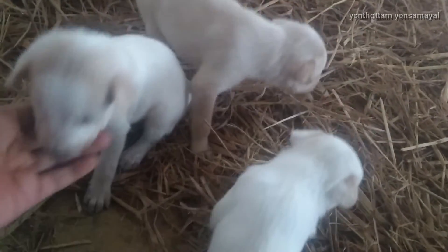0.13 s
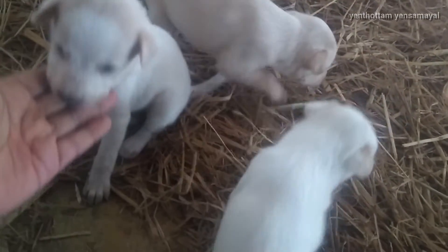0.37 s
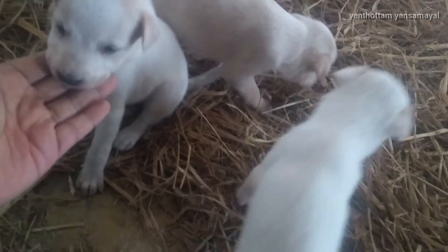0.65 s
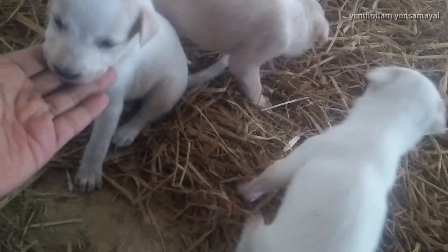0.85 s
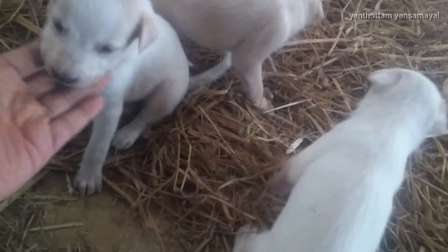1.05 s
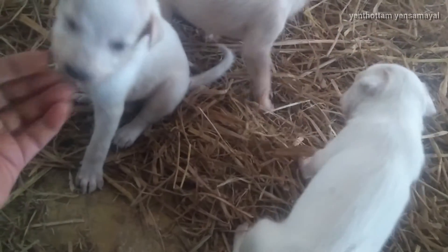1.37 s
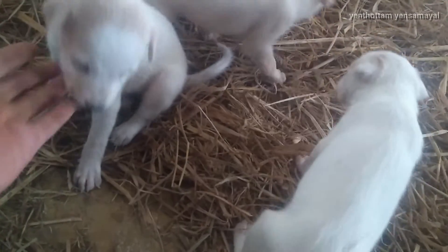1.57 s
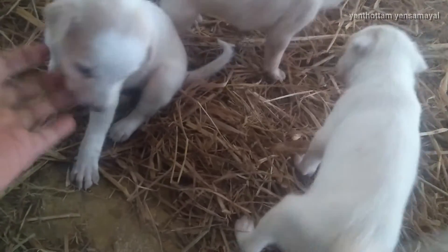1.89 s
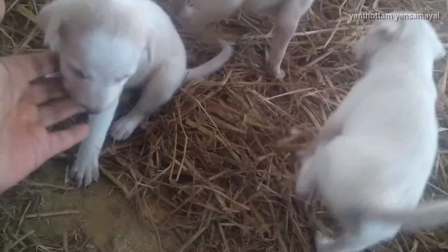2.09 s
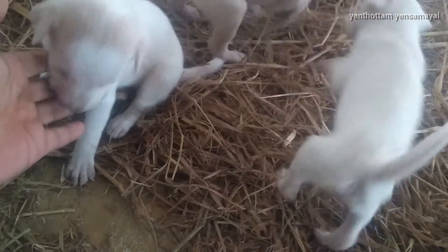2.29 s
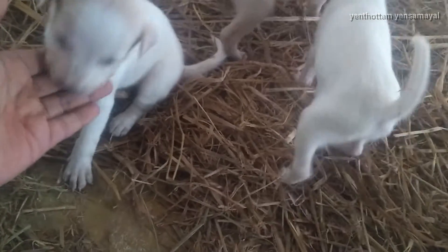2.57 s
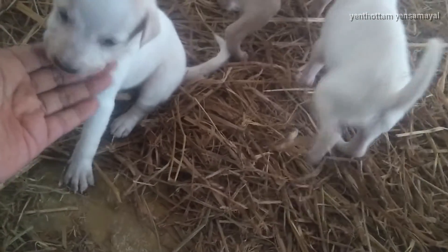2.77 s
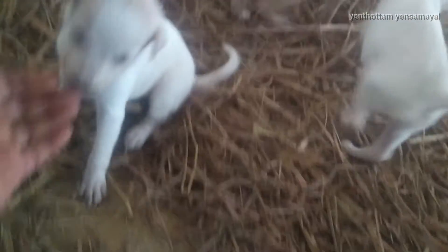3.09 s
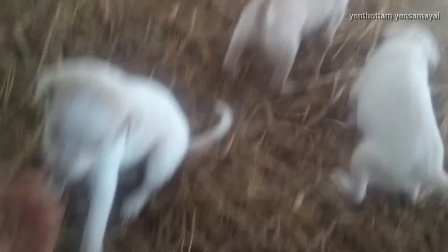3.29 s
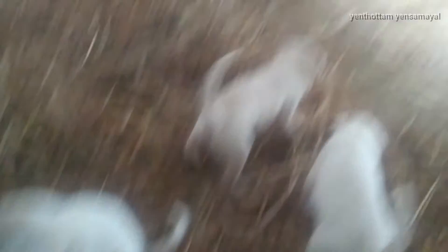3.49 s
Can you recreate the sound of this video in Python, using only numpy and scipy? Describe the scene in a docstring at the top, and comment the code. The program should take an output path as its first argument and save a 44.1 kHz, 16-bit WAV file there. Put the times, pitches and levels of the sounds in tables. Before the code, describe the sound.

Puppies whimpering close up in short high squeaky yelps, with faint straw rustle underneath

```python
"""Puppies whimpering close up

Puppies whimper in short, nearly pure glides, close to the microphone: sines with faint overtones.
Some calls come from farther off, rough and wet, with unsteady pitch and more echo.
A hiss with small crackles, perhaps straw, swells with the calls and in a few bursts between.
A shed rings briefly as a decaying noise tail, over a faint wavering background of noise.
A suppressor turns quiet moments down; a stereo widener sets left and right apart."""
import sys
import numpy as np
from scipy import signal
from scipy.fft import rfft, irfft, next_fast_len
from scipy.io import wavfile
from scipy.ndimage import uniform_filter1d

SR = 44100
rng = np.random.default_rng(int(sys.argv[2]) if len(sys.argv) > 2 else 0)


def volts(x):
    """Linear amplitude factor 10**(x/20) for a level x in dB, scalar or array-like."""
    e = np.asarray(x, float) / 20
    return 10 ** e


def log_audio(samples):
    """Write samples as a 16-bit WAV file to the path given in sys.argv[1]."""
    # one column per channel
    frames = np.atleast_2d(samples).T
    # limit to full scale, then quantise
    limited = np.clip(frames, -1, 1)
    pcm = np.round(limited * 32767).astype(np.int16)
    wavfile.write(sys.argv[1], SR, pcm)


N = 160965  # length in samples
HZ = np.fft.rfftfreq(next_fast_len(N), 1 / SR)  # frequency of each spectrum bin


def read(table, hz):
    """Interpolate a (frequency_hz, value) table on a log-frequency axis."""
    points = np.array(table)
    return np.interp(np.log(np.maximum(hz, 1)), np.log(points[:, 0]), points[:, 1])


def shape(x, gain):
    """Filter by multiplying the spectrum by a gain."""
    size = next_fast_len(N)
    return irfft(rfft(x, size) * gain, size)[..., :N]


def unit(x):
    """Scale to rms 1."""
    return x / np.sqrt(np.mean(x ** 2))


def walk(hz):
    """Smooth random drift of rms 1: noise through a Gaussian low-pass about hz wide."""
    return unit(shape(rng.standard_normal(N), np.exp(-(HZ / hz) ** 2)))


def diffuse(x, other):
    """Mix two noises as sum and difference, so that left and right are partly alike."""
    # likeness of a diffuse sound at left and right: frequency_hz, correlation (0 to 1)
    likeness = [(60, 0.83), (1500, 0.88), (2500, 1), (4300, 0.25), (7000, 0.41), (12000, 0.17)]
    alike = np.clip(read(likeness, HZ), 0, 1)
    common = shape(x, np.sqrt((1 + alike) / 2))
    opposed = shape(other, np.sqrt((1 - alike) / 2))
    return common + np.array([[1], [-1]]) * opposed


def puppies():
    """Gliding tones with overtones and a slightly unsteady larynx; returns direct sound and echo feed."""
    # each call, or a high overtone or echo of one given its own line:
    # voice, (octave_db, high_db at harmonic 3.5, echo_db, place), rows of (time_s, pitch_hz, level_db)
    # place: 1 left to -1 right, limited to that range
    whimpers = [ ("husky", (-8.5, -31, -0.5, -0.2), [(0.005, 788, -60), (0.052, 837, -49.5),
                (0.072, 923, -51), (0.09, 900, -42), (0.118, 906, -62), (0.14, 890, -41.5),
                (0.16, 889, -53.5), (0.182, 899.6, -44), (0.2, 887, -54.5)]),
                ("clear", (-1.5, -23.5, -16.5, 0.54), [(0.162, 1001, -52), (0.18, 1203, -44),
                (0.222, 1300, -43.5), (0.276, 1266, -41), (0.286, 973, -25.5), (0.298, 1108, -63)]),
                ("clear", (-39.5, -33, -5, -1), [(0.225, 796, -48.5), (0.245, 573, -49),
                (0.262, 566, -73)]), ("husky", (2, -33.5, 2, -0.26), [(0.35, 890, -49.5),
                (0.4, 1120, -54.5), (0.456, 1043, -49.5), (0.505, 1066, -50.5)]),
                ("clear", (-18, -44, 2, 8), [(0.452, 710, -80), (0.466, 659, -39.5), (0.485, 606, -105)]),
                ("clear", (-8.5, -35.5, -23.5, 0), [(0.503, 1106, -49.5), (0.512, 1011, -30),
                (0.532, 1007, -26), (0.539, 875, -20.5), (0.557, 871, -22.5), (0.566, 835, -41.5)]),
                ("clear", (-45, -34.5, -24, 3), [(0.556, 766, -37), (0.566, 674, -37.5),
                (0.58, 733, -76.5)]), ("husky", (-14.5, -35, -18, 3.7), [(0.653, 692, -48.5),
                (0.658, 669, -40), (0.664, 617, -51.5), (0.678, 636.4, -33), (0.692, 661, -26),
                (0.716, 800, -37), (0.762, 792.6, -29.5), (0.778, 827, -46.5)]),
                ("husky", (-29.5, -45, 2, 0), [(0.77, 3256, -71), (0.798, 3100, -61.5),
                (0.87, 3436, -82.5)]), ("husky", (-13, -34.5, -11, 0.5), [(0.942, 1050, -63.5),
                (0.974, 1080, -46.5), (1.0, 1024, -57.5)]), ("rough", (-34, -40, -17, 7),
                [(0.944, 642, -54.5), (0.961, 668, -53), (0.972, 611, -37), (0.986, 786, -49.5),
                (1.015, 638, -53.5)]), ("raspy", (-35, -35, -20.5, 10), [(1.187, 742, -57.5),
                (1.194, 751, -34), (1.208, 753, -31), (1.221, 785, -31.5), (1.227, 665.4, -41),
                (1.236, 641, -28), (1.245, 628.3, -30), (1.258, 633, -44), (1.295, 693, -54)]),
                ("husky", (-40, -53.5, 2.5, -0.6), [(1.185, 3815, -59), (1.221, 3934, -56.5),
                (1.28, 3740, -67)]), ("clear", (-32, -44, -9.5, 1.5), [(1.22, 2620, -68),
                (1.276, 2610, -57), (1.295, 2481, -76.5)]), ("clear", (-20.5, -37, -24.5, 0.5),
                [(1.421, 773, -55.5), (1.432, 740, -32.5), (1.447, 743, -30.5), (1.458, 750, -56)]),
                ("clear", (-18, -22, -16, -5.5), [(1.672, 1145, -68), (1.722, 1188, -60),
                (1.75, 1144, -63)]), ("clear", (-18.5, -45.5, -7, 0.3), [(1.735, 993, -56.5),
                (1.749, 955, -53), (1.762, 779, -58.5)]), ("husky", (-37.5, -34.5, -8, 5.5),
                [(1.778, 1550, -82), (1.794, 1592, -52.5), (1.83, 1530, -84)]),
                ("clear", (-11, -27.5, -14.5, 0), [(1.93, 1203, -78), (1.992, 1187, -46),
                (2.014, 1227, -41.5), (2.035, 854, -52)]), ("husky", (-8, -26, -3.5, 0), [(2.18, 1296, -66),
                (2.22, 1380, -49.5), (2.25, 1361, -64.5), (2.267, 1317, -35.5), (2.28, 1210, -61)]),
                ("rough", (-28.5, -50.5, -1.5, -3.3), [(2.168, 2800, -47), (2.2, 2773, -71.5),
                (2.27, 2750, -81)]), ("clear", (-22.5, -38, -13.5, .01), [(2.243, 950, -75),
                (2.253, 964, -38.5), (2.264, 1046, -33.5), (2.279, 880, -32.5), (2.288, 715, -38.5)]),
                ("clear", (-50, -55, 1.5, -4.5), [(2.298, 3440, -54), (2.323, 3434, -46.5),
                (2.342, 3431, -69.5), (2.357, 3450, -50.5), (2.405, 3388, -43), (2.427, 3370, -50.5),
                (2.44, 3220, -40.5)]), ("clear", (-2, -24, -14, .4), [(2.486, 1312, -61.5),
                (2.498, 1314, -40), (2.516, 1321, -36.5), (2.526, 1424, -24.5), (2.542, 1454, -21),
                (2.568, 1441, -21.5), (2.59, 1358, -34), (2.6, 1260, -63)]), ("raspy", (19, -10, -10, 0.2),
                [(2.595, 1188, -43.5), (2.602, 1169, -45.5), (2.617, 1028, -52)]),
                ("clear", (1, -19, -10, 0.45), [(2.779, 1324, -42.5), (2.79, 1258, -35),
                (2.812, 1297, -28.5), (2.828, 1377, -25.5), (2.846, 1396, -33.5), (2.866, 1292, -38),
                (2.883, 1312, -37), (2.889, 973, -37), (2.899, 915, -46.5)]),
                ("clear", (-11.5, -25, -8, 0.32), [(3.063, 1183, -56.5), (3.082, 1106, -35.5),
                (3.098, 1098, -43.5), (3.118, 1123, -30), (3.138, 1123, -31.5), (3.146, 1076, -38)]),
                ("clear", (-20, -47, -22.5, -0.33), [(3.144, 1000, -45.5), (3.156, 1023, -27),
                (3.174, 926, -23), (3.192, 920.5, -22), (3.214, 983, -25), (3.266, 1012, -26),
                (3.28, 941, -27.5), (3.288, 1034, -53)]), ("clear", (-38, -45, -16, -8), [(3.268, 834, -80),
                (3.276, 796, -42.5), (3.305, 605, -53)]), ("husky", (8, -33, -7, 0.7),
                [(3.297, 1486, -69.5), (3.35, 1526, -70.5), (3.39, 1416, -67), (3.44, 1456, -54)]),
                ("clear", (-3.5, -21.5, -8.5, 0), [(3.445, 1178, -67), (3.463, 1140, -39.5),
                (3.519, 1248, -35.5), (3.563, 1118, -39), (3.629, 1183, -44), (3.65, 1166, -36.5)]),
                ("raspy", (-14, -36, -8.5, 0.6), [(3.465, 818, -56), (3.513, 941, -35.5),
                (3.525, 831, -41.5), (3.57, 880, -78)]), ]
    # each voice: pitch_shake (share of pitch), level_flutter_db, overtone_waver_db (before scaling), breath_db
    voices = {"clear": (.003, .6, 2.5, -43), "husky": (.012, 1.6, 4, -28), "raspy": (.014, 1.3, 5, -25),
              "rough": (.035, 3.5, 4, -20)}
    # colour of the breath noise: frequency_hz, gain_db
    breath_colour = [(300, -30), (470, 0), (2000, -5), (2500, -30)]
    wobble_hz = 124.4  # speed of the roughness
    attack_s, edge_s = 0.002, 0.0053  # fade before the first row and after the last
    side_ms = 0.07  # lead of the nearer side for a line fully to that side
    closing_db = 28  # overtones lost for each octave under the top pitch of a line, as the mouth closes

    direct, feed = np.zeros((2, N)), np.zeros(N)
    shake, flutter, waver = walk(wobble_hz), walk(wobble_hz), walk(70.)
    breath = unit(shape(rng.standard_normal(N), volts(read(breath_colour, HZ))))
    for voice, (octave_db, high_db, echo_db, place), rows in whimpers + moans():
        row_s, row_hz, row_db = np.array(rows).T
        shake_share, flutter_db, waver_db, breath_db = voices[voice]
        first = max(int((row_s[0] - edge_s) * SR), 0)
        last = min(int((row_s[-1] + edge_s) * SR), N)
        i = np.arange(first, last)
        t = i / SR

        glide = np.interp(t, row_s, row_hz)
        pitch = uniform_filter1d(glide, size=99) * (1 + shake_share * shake[i])
        # left and right each take half of the lead
        side_s = side_ms * np.clip(place, -1, 1) / 2000 * np.array([[1], [-1]])
        phase = 2 * np.pi * (np.cumsum(pitch) / SR + pitch * side_s)

        bright = overtones(phase, pitch, i, octave_db, high_db, waver_db, waver, flutter)
        mouth = volts(closing_db * np.log2(glide / row_hz.max()))
        tone = np.sin(phase) + bright * mouth + volts(breath_db) * breath[i]

        fades = np.minimum((t - row_s[0]) / attack_s, (row_s[-1] - t) / edge_s)
        edge = np.clip(fades + 1, 0, 1) ** 2
        level = volts(np.interp(t, row_s, row_db) + flutter_db * flutter[i])
        line = np.sqrt(2) * tone * edge * level
        direct[:, i] += line
        feed[i] += line[0] * volts(echo_db)
    return direct, feed


def overtones(phase, pitch, i, octave_db, high_db, waver_db, waver, flutter):
    """Harmonics 2 to 10 of a line, coloured by throat and mouth and unsteady in level and phase."""
    # colour of throat and mouth on harmonics 3 and up: frequency_hz, gain_db
    throat = [(2000, 2), (3500, -14.5), (4200, 15), (4600, -11), (5700, 11.5), (6500, 5), (7700, 0.5),
              (11000, -9.5)]
    fall_db, blur_rad = -4, 0.2  # fall per harmonic; unsteady phase
    octave = volts(octave_db + 0.5 * waver_db * waver[i])
    tone = -octave * np.cos(2 * phase + blur_rad * flutter[i])
    for k in range(3, 11):
        own = (i + k * SR // 7) % N  # each overtone wavers on its own
        level_db = high_db + fall_db * (k - 3.5) + read(throat, k * pitch)
        level = volts(level_db + 2.17 * waver_db * waver[own])
        in_range = k * pitch < 15000
        tone += level * np.sin(k * phase + blur_rad * flutter[own]) * in_range
    return tone


def moans():
    """Faint low moans farther off, as lines in the rough voice that fade in their second half."""
    # start_s, length_s, pitch_hz, level_db halfway
    far_moans = [(1.8, 0.045, 416, -84), (1.941, 0.086, 403.3, -80), (2.778, 0.11, 386.3, -81)]
    lines = []
    for start, length, hz, db in far_moans:
        rows = [(start, hz, db + 1), (start + length / 2, hz, db), (start + length, hz, db - 23.0)]
        lines.append(("rough", (-2.0, -6.5, 14, 1.5), rows))
    return lines


def shed(feed):
    """Ring of the shed: convolution with a short decaying noise tail, a little different left and right."""
    t60_s, gap_s = 0.29, 0.0029  # time to fall 60 dB; silence before the tail
    t = np.arange(N) / SR
    decay = volts(-60 * t / t60_s) * (t > gap_s)
    tails = diffuse(*(rng.standard_normal((2, N)) * decay))
    tails = tails[:, :SR] / np.sqrt(np.sum(tails[0] ** 2))
    return signal.fftconvolve(feed[None], tails, axes=1)[:, :N]


def swelling_hiss():
    """Filtered noise with small crackles, perhaps straw, swelling with the calls and in bursts between."""
    # swells of the hiss: time_s, level_db of the treble above 8 kHz (relative, before the final lift)
    swells = [(0.0, -88.5), (0.059, -66), (0.12, -74), (0.242, -51.5), (0.44, -74), (0.52, -59),
              (0.602, -63), (0.642, -90.5), (0.662, -56), (0.91, -84.5), (1.0, -74.5), (1.129, -86.5),
              (1.22, -69.5), (1.36, -74), (1.44, -67.5), (1.489, -78), (1.65, -80), (1.74, -65.5),
              (1.769, -75), (1.79, -63), (1.83, -76.5), (1.94, -78), (1.971, -66.5), (2.04, -66.5),
              (2.11, -80.5), (2.261, -64), (2.4, -65), (2.438, -50.5), (2.49, -60.5), (2.582, -49),
              (2.661, -65), (2.781, -66), (2.811, -56), (2.98, -66.5), (3.009, -76), (3.231, -65),
              (3.278, -77.5), (3.48, -56), (3.65, -62)]
    # colour of the hiss: frequency_hz, gain_db (relative)
    hiss_colour = [(150, -23.5), (900, -32), (1300, -33), (1750, -4), (2200, -12), (3500, -4),
                   (4300, -10.5), (5700, -6.5), (14600, -22.5), (16000, -21.5)]
    crackles_per_s, spread_db, crackle_db = 330, 3, -8  # rate per side; size spread; level against the hiss
    happens = rng.random((2, N)) < crackles_per_s / SR
    size = volts(spread_db * rng.exponential(size=(2, N))) * happens
    crackles = unit(size * rng.standard_normal((2, N)))
    grain = unit(rng.standard_normal((2, N)) + volts(crackle_db) * crackles)

    gain = volts(read(hiss_colour, HZ))
    treble = np.sqrt(np.mean(gain ** 2 * (HZ > 8000)))
    hiss = diffuse(*shape(grain, gain / treble))
    row_s, row_db = np.array(swells).T
    level = volts(np.interp(np.arange(N) / SR, row_s, row_db))
    return volts(1.0) * hiss * level  # 1 dB lift


def air():
    """Faint background: coloured noise, partly alike left and right, whose level wavers a little."""
    # colour of the background: frequency_hz, gain_db (relative)
    air_colour = [(30, -12), (120, 2.5), (300, -6), (900, -9), (2250, -12), (2900, -10), (5900, -17.5),
                  (14400, -22.5), (16000, -49)]
    level_db, waver_db = -70.5, 2.1
    noise = shape(rng.standard_normal((2, N)), volts(read(air_colour, HZ)))
    return unit(diffuse(*noise)) * volts(level_db + waver_db * walk(4.))


def scene():
    """Sum of all sources, left and right."""
    direct, feed = puppies()
    return direct + shed(feed) + swelling_hiss() + air()


def roll_off(x):
    """The treble ends steeply here."""
    return signal.sosfilt(signal.butter(12, 16330, fs=SR, output="sos"), x)


def record(dry):
    """A suppressor lowers quiet moments; a stereo widener sets left and right apart in phase and treble."""
    # phase of the widener: frequency_hz, lead of the left in half turns
    widener_lead = [(140, 1.), (300, 1.45), (650, 2.), (1400, 2.1), (2230, 3.), (2900, 3.75), (4300, 5.),
                    (5700, 6.17), (7200, 7.25), (8600, 7.9), (11200, 9.9), (16000, 13.6)]
    # level balance of the widener: frequency_hz, left over right in dB
    widener_balance = [(700, 1.05), (2400, -0.3), (4400, 0.5), (8500, -7), (15000, -6)]
    quiet_db, most_db = -55.5, 8  # level under which it turns down; most it takes away
    slope, smooth_s = 0.48, 0.0062  # dB taken per dB under; averaging time, applied twice

    k = int(smooth_s * SR)
    power = np.mean(dry ** 2, axis=0)
    power = uniform_filter1d(uniform_filter1d(power, k), k)
    heard_db = 10 * np.log10(power + 1e-12)
    kept = dry * volts(np.clip(slope * (heard_db - quiet_db), -most_db, 0))

    # left and right each take half of the difference, in opposite directions
    lead_rad = np.pi * np.interp(HZ, *np.array(widener_lead).T) / 2
    half = volts(read(widener_balance, HZ) / 2) * np.exp(1j * lead_rad)
    mix = -shape(kept, np.array([half, 1 / half]))
    return roll_off(mix)


dry = scene()
out = record(dry)
log_audio(out)
```